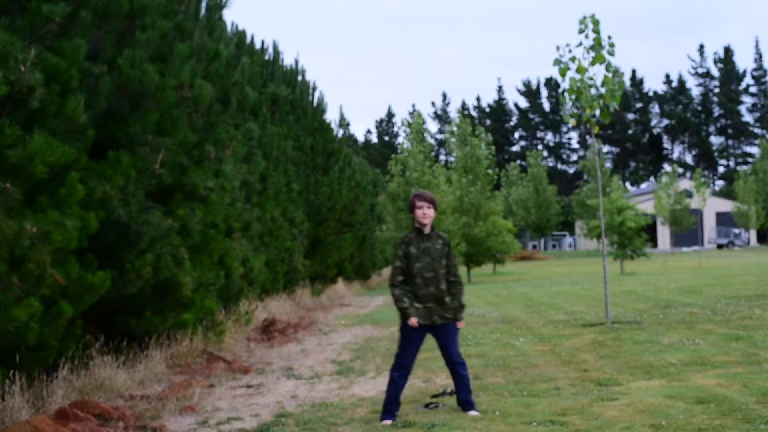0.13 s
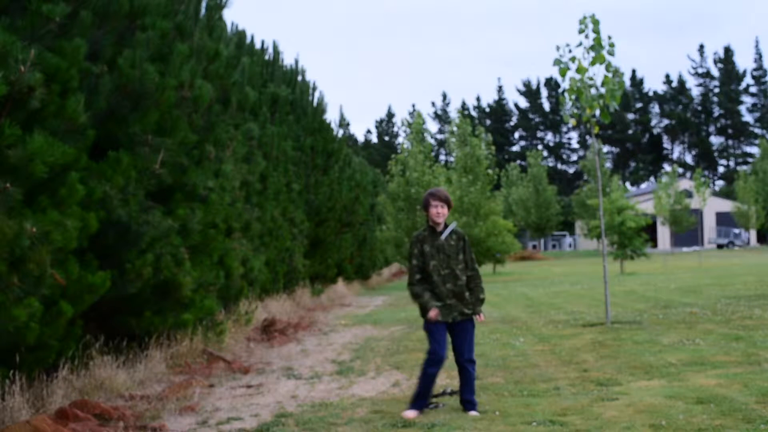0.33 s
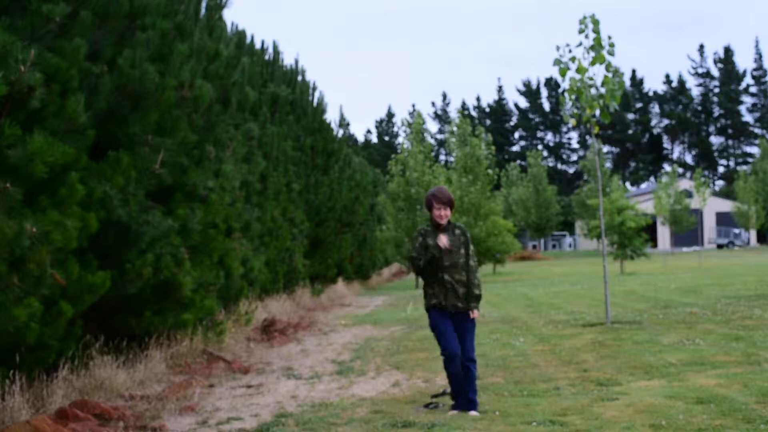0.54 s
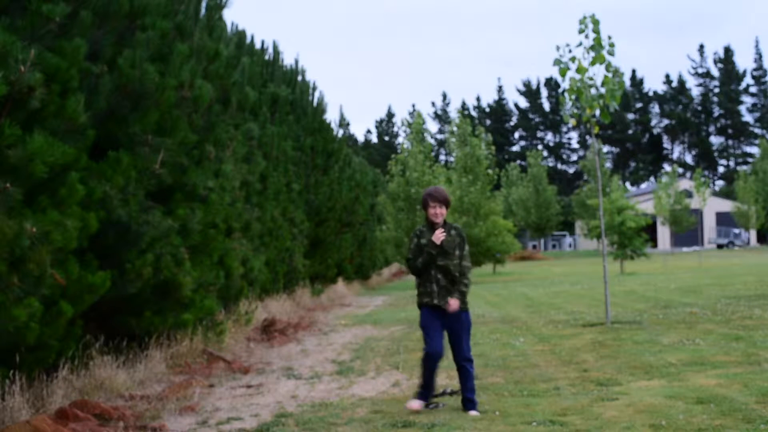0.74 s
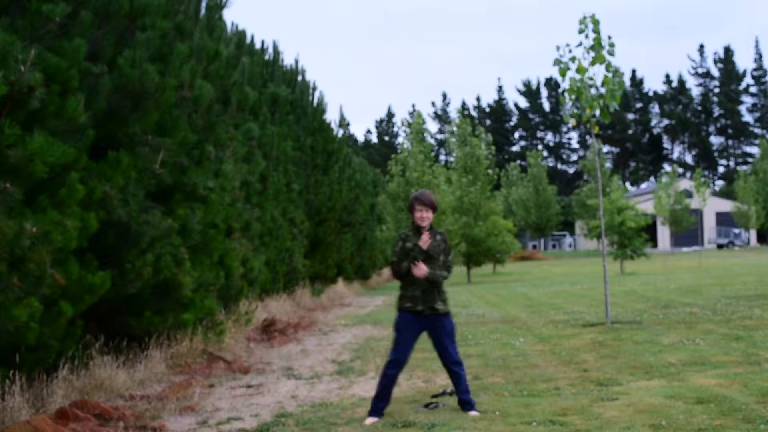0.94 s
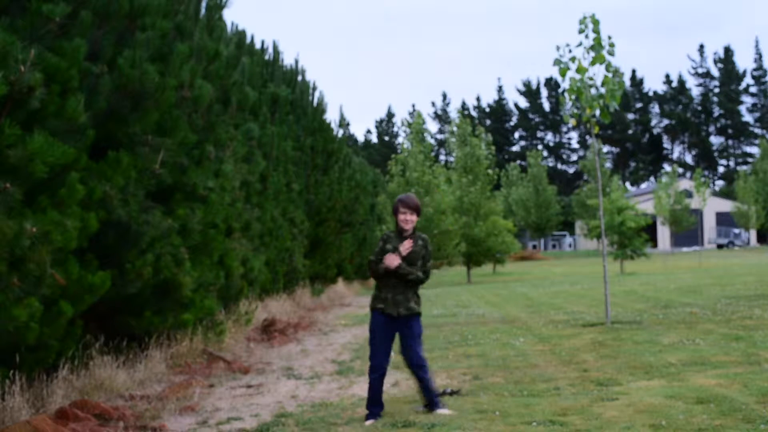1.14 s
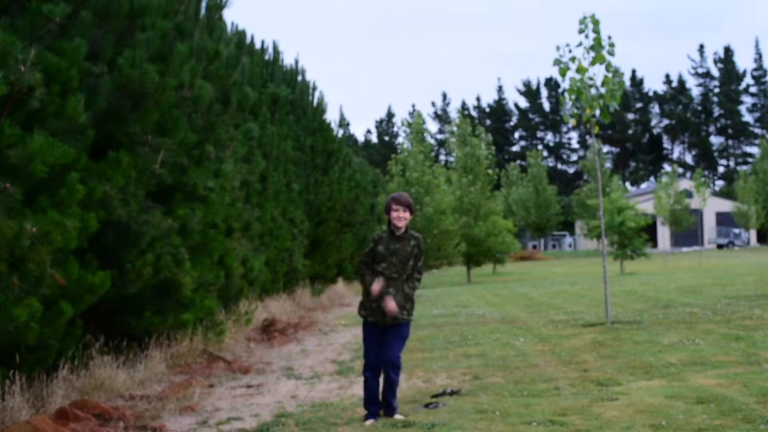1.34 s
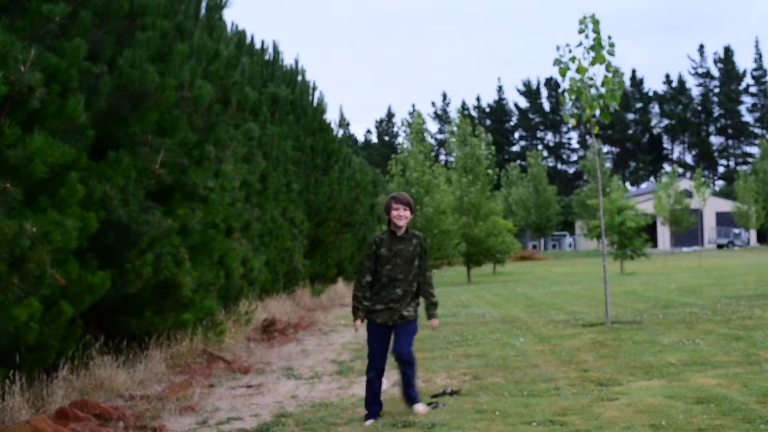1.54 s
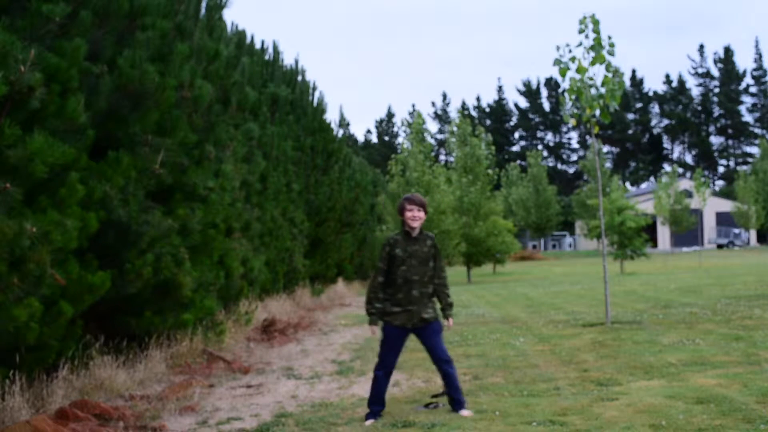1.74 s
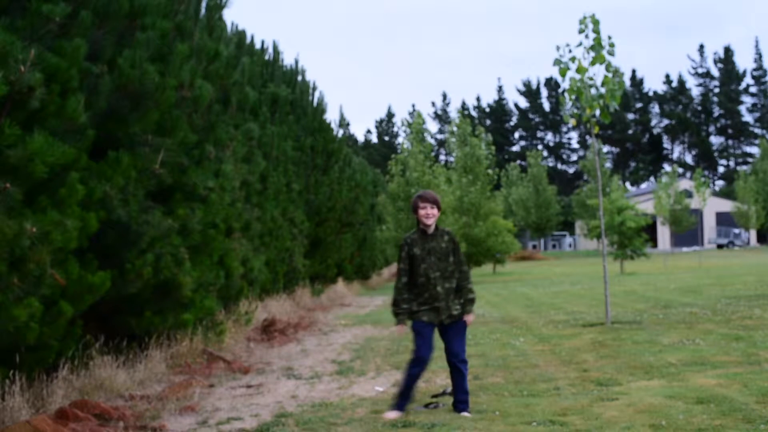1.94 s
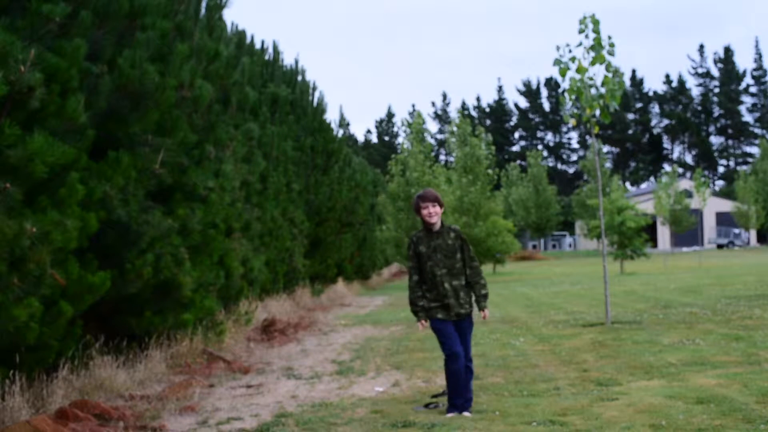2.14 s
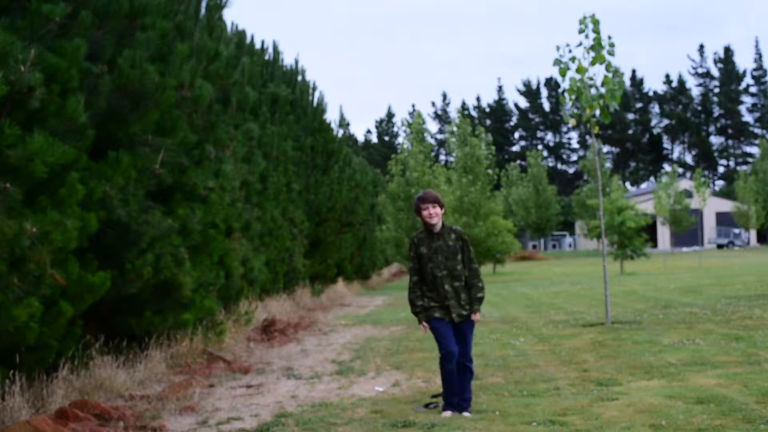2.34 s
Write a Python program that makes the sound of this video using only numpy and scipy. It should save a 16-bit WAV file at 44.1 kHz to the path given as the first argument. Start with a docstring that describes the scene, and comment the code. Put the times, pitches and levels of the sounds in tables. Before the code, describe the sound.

A spring toy blaster fires one hard, overloaded plastic crack close to the microphone, then soft handling knocks and sleeve rustle, and finally the slide is pulled back with clicking snaps; faint birds in an open field.

```python
"""A spring-powered foam dart blaster fires close to the microphone in an open field and overloads it.
Rough noise bursts and ringing plastic make its clacks; a pulse rings the barrel. Its shell knocks softly
in the hands and sleeves rustle; then the slide is pulled back, latches with a snap and starts forward again.
Trees scatter a short echo as dying noise. Small birds chirp far off in gliding tones,
over quiet air of filtered noise, a faint low hum and one faint far tone."""
import sys
import numpy as np
from scipy import signal
from scipy.fft import rfft, irfft
from scipy.io import wavfile
from scipy.ndimage import map_coordinates

SR = 44100
rng = np.random.default_rng(int(sys.argv[2]) if len(sys.argv) > 2 else 0)


def digitize_waveform(pressure):
    """Quantize a signal to 16-bit integers and store it at the path in sys.argv[1].

    Rows of a 2-D input are taken as channels; values are limited to [-1, 1].
    """
    field = np.atleast_2d(pressure).T
    bounded = np.clip(field, -1, 1)
    quanta = np.round(bounded * 32767).astype(np.int16)
    wavfile.write(sys.argv[1], SR, quanta)


N = 105840
TIME = np.arange(N) / SR   # seconds

# Ringing tones of the plastic shell. Each row: pitch in Hz, relative level in dB, time to fall 60 dB in seconds.
SHELL_MODES = [(1336, -9, 0.028), (1490, -11, 0.04), (1565, -15.5, 0.041), (2225, -6, 0.031),
               (2390, -8.5, 0.035), (2518, -6, 0.038), (2925, -9.5, .035), (4330, -13, 0.06),
               (4566, -12.5, 0.045), (4810, -9.5, 0.04), (7960, -16, 0.04)]
# Ringing tones of the slide and its latch. Each row: pitch in Hz, relative level in dB,
# time to fall 60 dB in seconds.
LATCH_MODES = [(1040, -9, 0.044), (1320, -10.5, .03), (1890, -13.5, 0.044), (2130, -11, .055),
               (2310, -8.5, 0.03), (2500, -10, .025), (2870, -9, 0.039), (3760, -9, 0.019),
               (4720, -9, 0.016)]
# Tone colour of the crack of plastic parts. Each row: frequency in Hz, relative level in dB per Hz.
CRACK_SPECTRUM = [(80, -33), (400, -5), (1000, -2.5), (2500, 2.5), (3500, -2.5), (5000, -1.5), (7500, -3),
                  (9000, -11), (12500, -15), (16000, -20.5)]
# Tone colour of the slide's hollow knock on the body. Each row: frequency in Hz, relative level in dB per Hz.
KNOCK_SPECTRUM = [(60, -36), (240, -20), (400, -6), (530, -3.5), (660, 3.5), (830, -3), (1100, -4.5),
                  (2000, -14), (4000, -25.5), (16000, -46)]
# Tone colour of the outdoor air. Each row: frequency in Hz, relative level in dB per Hz.
AIR_SPECTRUM = [(15, -43), (25, -17), (45, -11), (75, -12), (110, -6), (160, 1), (225, -8.5), (305, -3.5),
                (500, -11), (850, -8.5), (1600, -21.5), (2600, -20.5), (3400, -13), (6000, -24.5),
                (15500, -31)]


def from_db(db):
    """Turn decibels into a gain."""
    return 10 ** (np.asarray(db) / 20)


def rms_one(x):
    """Scale to an rms (average strength) of 1."""
    return x / np.sqrt(np.mean(x ** 2) + 1e-20)


def colour(x, spectrum):
    """Filter with the given spectrum, never sounding ahead of the input; white noise keeps its power."""
    size = 8192
    hz, db = np.transpose(spectrum)
    bin_hz = np.arange(size // 2 + 1) * SR / size
    gain = rms_one(from_db(np.interp(np.log(bin_hz + 1), np.log(hz), db)))
    # folding the cepstrum forward gives the filter its quickest response (minimum phase)
    cepstrum = irfft(np.log(gain))
    cepstrum[1:size // 2] *= 2
    cepstrum[size // 2 + 1:] = 0
    response = irfft(np.exp(rfft(cepstrum)))
    return signal.fftconvolve(x, response)[:N]


def drift(rate):
    """Smooth random motion of rms 1, drawn through `rate` random points per second."""
    points = rng.standard_normal(N // 20)
    return rms_one(map_coordinates(points, [TIME * rate], order=2, mode="wrap"))


def ring(drive, modes):
    """Sum of decaying tones with alternating signs; a unit click rings each at its level."""
    out = 0
    for k, (hz, db, t60) in enumerate(modes):
        r = from_db(-60 / (t60 * SR))   # what is left after one sample
        w = 2 * np.pi * hz / SR
        tone = signal.lfilter([0, np.sin(w)], [1, -2 * r * np.cos(w), r * r], drive + 1e-18)
        out = out + (-1) ** k * from_db(db) * tone
    return out


def grains(spread_db):
    """Dense tiny contacts of uneven strength, as noise of rms 1."""
    strength = from_db(spread_db * np.clip(drift(1800), -2, 2))
    return rms_one(rng.standard_normal(N) * strength)


def decay(start, seconds):
    """Envelope that jumps to 1 and falls to 1/e in the given seconds."""
    return (TIME >= start) * np.exp(-np.maximum(TIME - start, 0) / seconds)


def scatter(x, t60, delay):
    """Dense dying echoes from ground and foliage, at equal power."""
    echoes = rng.standard_normal(N) * decay(delay, t60 / np.log(1000))
    return signal.fftconvolve(x, echoes / np.sqrt(np.sum(echoes ** 2)))[:N]


def contacts(rows, crack_spectrum, knock_spectrum, modes, rise_s, shell_db, strike, grain_db):
    """Plastic parts meet and chatter briefly: a crack, a dull knock and ringing plastic."""
    treble_hz, shell_chatter = 4500, .12   # where treble takes over; how much chatter drives the ringing
    clicks, chatter, knock, treble = np.zeros((4, N))
    for s, db, seconds, knock_db, treble_db in rows:
        rise = np.clip((TIME - s) / rise_s, 0, 1)
        power = (from_db(db) * decay(s, seconds) * rise) ** 2
        clicks[min(int((s + rise_s) * SR), N - 1)] += from_db(db)
        chatter += power
        knock += power * from_db(knock_db) ** 2
        treble += power * from_db(treble_db) ** 2
    low = signal.butter(1, treble_hz, "low", fs=SR)
    high = signal.butter(1, treble_hz, "high", fs=SR)
    grit = grains(grain_db)
    crack = signal.lfilter(*low, grit * np.sqrt(chatter))
    crack += signal.lfilter(*high, grit * np.sqrt(treble))
    drive = strike * clicks + shell_chatter * grains(grain_db) * np.sqrt(chatter)
    ringing = from_db(shell_db) * ring(drive, modes)
    dull_knock = colour(grains(grain_db) * np.sqrt(knock), knock_spectrum)
    return colour(crack, crack_spectrum) + dull_knock + ringing


def shot():
    """The catch lets go, then the plunger lands and rebounds, rattling the shell."""
    # Each row: start in seconds, level in dB, chatter decay in seconds,
    # knock and treble in dB relative to that level.
    shot_hits = [(.2216, -14, 0.014, -11.5, 2), (.2272, -4.5, 0.0052, 2, -3), (.2326, -6, 0.0029, 1.5, 2),
                 (.2428, -11, 0.004, -15, 1.5), (.2450, -11.5, .003, -12, 2.5),
                 (.2530, -29.5, 0.013, -8.5, 4)]
    # Hard crack of the plunger. Each row: frequency in Hz, relative level in dB per Hz.
    slam_spectrum = [(100, -18), (400, -7), (1000, -2), (1500, 0), (1950, -2), (2500, 3.5), (3500, -5.5),
                     (4800, -0.5), (7500, -5.5), (8600, -11), (12500, -13), (16000, -23)]
    # Thump of the plunger. Each row: frequency in Hz, relative level in dB per Hz.
    thump_spectrum = [(30, -5), (80, -22), (180, -16.5), (260, -21), (460, -4.5), (700, -3.5), (1100, -2),
                      (1600, -5.5), (3000, -16.5), (16000, -50)]
    return contacts(shot_hits, slam_spectrum, thump_spectrum, SHELL_MODES,
                    rise_s=.0006, shell_db=-8.5, strike=0.82, grain_db=2.5)


def air_pop():
    """The plunger drives a pulse of air out of the barrel and sets it ringing."""
    # Air column and spring chamber. Each row: pitch in Hz, relative level in dB, time to fall 60 dB in seconds.
    barrel_modes = [(108, -33, 0.11), (194, -19.5, 0.066), (319, -21.5, 0.055), (442.7, -14.5, .055),
                    (590, -13.5, 0.035), (683, -7.5, .055), (920.5, -6, 0.039), (1080, -0.5, 0.04),
                    (1385, -8.5, .045), (1563, -8.5, 0.04), (1730, -9.5, .045)]
    start_s, rise_s = .2273, 0.00087
    puff_db, puff_decay_s = -22.5, 0.0043   # the low puff, under the same rise
    pulse = np.zeros(N)
    pulse[int(start_s * SR)] = 1
    swell = 1 - np.exp(-np.maximum(TIME - start_s, 0) / rise_s)
    puff = from_db(puff_db) * decay(start_s, puff_decay_s)
    return swell * (ring(pulse, barrel_modes) + puff)


def catches():
    """The catches of the slide snap and knock as it is pulled back and starts forward."""
    # Each row: start in seconds, level in dB, chatter decay in seconds,
    # knock and treble in dB relative to that level.
    catch_hits = [(2.0078, -37, .016, -17, -2), (2.0212, -33, 0.0037, -18, 10.5),
                  (2.0266, -21.5, 0.0038, -22, 3.5), (2.0306, -25.5, 0.0061, -3, 0),
                  (2.0403, -29, 0.005, 0, 10), (2.0558, -30.5, 0.0043, -2, 4),
                  (2.0655, -35.5, 0.0074, 1, -3), (2.0824, -29, 0.004, -10.5, 8),
                  (2.0995, -40, 0.007, -1.5, 2), (2.1094, -38, 0.007, -6, 6), (2.1195, -28, .008, -10, 0),
                  (2.1250, -25, 0.0066, -13, 9), (2.1293, -15.5, 0.0032, -3.5, 5),
                  (2.1349, -26, 0.007, 1, -6), (2.3266, -28.5, 0.0047, -18, 0), (2.3770, -37, .005, 0, -15),
                  (2.3825, -36.5, 0.0058, 6.5, 5.5), (2.3928, -35.5, 0.0052, 10, 8.5)]
    return contacts(catch_hits, CRACK_SPECTRUM, KNOCK_SPECTRUM, LATCH_MODES,
                    rise_s=.0006, shell_db=-3, strike=0.28, grain_db=2.0)


def slide():
    """The slide scrapes along its rails and keeps its ringing tones going."""
    # Strength of the rubbing, joined by straight lines. Each row: time in seconds, level in dB before the mix.
    rub_levels = [(1.94, -71), (2.002, -61.5), (2.016, -38), (2.062, -38), (2.079, -46), (2.12, -48),
                  (2.155, -40), (2.205, -59.5), (2.31, -65), (2.36, -51.5), (2.40, -51)]
    rub = from_db(np.interp(TIME, *np.transpose(rub_levels))) * grains(spread_db=2.5)
    scrape = 1.1 * colour(rub, CRACK_SPECTRUM)
    hollow = from_db(-9.5) * colour(rub, KNOCK_SPECTRUM)
    return scrape + hollow + 0.039 * ring(rub, LATCH_MODES)


def pawl():
    """The stiff catch pings brightly each time it drops into a notch."""
    # Each row: time of the drop in seconds, level in dB.
    drops = [(2.0412, -28), (2.0832, -31), (2.1298, -12.5)]
    # Ringing tones of the catch. Each row: pitch in Hz, relative level in dB, time to fall 60 dB in seconds.
    pawl_modes = [(5660, -1, .024), (6260, -3, .024)]
    clicks = np.zeros(N)
    for s, db in drops:
        clicks[int(s * SR)] = from_db(db)
    return ring(clicks, pawl_modes)


def handling():
    """The shell knocks softly in the hands, with a hollow thud and a short ring."""
    # Each row: start in seconds, level in dB, chatter decay in seconds,
    # knock and treble in dB relative to that level.
    hand_knocks = [(.470, -58.5, 0.021, 5, -4), (.904, -44, .001, 2, 4.5), (.919, -45, 0.0013, -9, 10.5),
                   (.951, -50, 0.006, 3, -9.5), (0.979, -53.5, 0.008, 10.5, -8),
                   (.990, -56.5, 0.0072, 12, -6), (1.032, -51, 0.0096, 13.5, 4),
                   (1.073, -54.5, 0.006, 16, 9), (1.311, -41.5, 0.0094, -1.5, -9),
                   (1.333, -46, 0.012, -1.5, -2.5), (1.86, -49.5, .004, -2, -2),
                   (1.902, -46.5, 0.0067, -13, -13), (1.927, -43, 0.0093, -6, -23)]
    # Hollow thud of the hands. Each row: frequency in Hz, relative level in dB per Hz.
    thud_spectrum = [(60, -32), (170, -7), (350, -1.5), (620, 2), (1000, -6), (1400, -4.5), (2500, -20),
                     (16000, -55)]
    return contacts(hand_knocks, CRACK_SPECTRUM, thud_spectrum, SHELL_MODES,
                    rise_s=0.00136, shell_db=-6.5, strike=0.33, grain_db=2.5)


def sleeves():
    """Sleeves rub as the hands move: uneven rustle and smooth swish in soft swells of noise."""
    # Each row: middle in seconds, spread (standard deviation) in seconds, rustle in dB, swish in dB.
    moves = [(0.517, 0.11, -64.5, -70.5), (0.998, 0.066, -56.5, -68), (1.28, 0.082, -72, -64.5),
             (1.79, .06, -63.5, -65.5), (1.916, 0.04, -60, -70)]
    # Rustling cloth. Each row: frequency in Hz, relative level in dB per Hz.
    cloth_spectrum = [(100, -12.5), (400, 5.5), (900, 3), (2000, -0.5), (5000, -7.5), (16000, -18.5)]
    # Cloth sliding on cloth. Each row: frequency in Hz, relative level in dB per Hz.
    swish_spectrum = [(1500, -14.5), (5500, 1), (8300, -1.5), (11000, -13)]
    rustle, swish = np.zeros((2, N))
    for s, spread_s, rustle_db, swish_db in moves:
        swell = np.exp(-.5 * ((TIME - s) / spread_s) ** 2)
        rustle += from_db(rustle_db) * swell
        swish += from_db(swish_db) * swell
    scuffs = from_db(2.5 * drift(110))   # unevenness, 2.5 dB rms
    rustling = colour(rustle * scuffs * grains(spread_db=2.5), cloth_spectrum)
    return rustling + colour(swish * rng.standard_normal(N), swish_spectrum)


def field_echoes(blaster):
    """The hedge and the trees send the blaster's sound back as dense, dying echoes."""
    # Tone colour of the echoes. Each row: frequency in Hz, relative level in dB per Hz.
    echo_spectrum = [(40, 4), (110, 9.5), (190, -1), (290, 3), (700, -2.5), (1150, -4), (2400, -4.5),
                     (4000, 1), (8000, -1), (15000, -10)]
    # Each row: delay in seconds, time to fall 60 dB in seconds, level in dB before halving.
    reflections = [(0.013, .13, -21), (.053, .085, -27.5), (.08, .9, -42)]
    sent = colour(blaster, echo_spectrum)
    return sum(.5 * from_db(db) * scatter(sent, t60, delay) for delay, t60, db in reflections)


def birds():
    """Birds sing short warbling glides, heard straight, through nearby leaves and blurred by the trees."""
    # Each row: start in seconds, length in seconds, first and last pitch in Hz before the warble,
    # level in dB before the three paths.
    chirps = [(0.0, 0.013, 3480, 3310, -48.5), (0.023, 0.029, 3250, 3310, -47.5),
              (0.045, 0.02, 3300, 3010, -50), (0.056, 0.011, 2720, 2700, -56),
              (0.181, 0.018, 3700, 3240, -63.5), (0.586, .03, 3397, 3020, -62.5),
              (0.638, 0.016, 4360, 4690, -56.5), (.648, .042, 3405, 3150, -61.5),
              (0.707, 0.0093, 4136, 4004, -61), (0.856, .03, 3487, 3195, -64),
              (1.092, 0.027, 4530, 3936, -60), (1.427, 0.028, 3500, 5090, -54),
              (1.452, 0.032, 3950, 3077, -50), (1.494, 0.029, 3170, 3390, -50.5),
              (1.52, 0.014, 3054, 2980, -49), (1.640, 0.026, 4100, 3600, -64),
              (1.676, 0.03, 3130, 3260, -53.5)]
    song = np.zeros(N)
    warble = 1 + 0.045 * drift(420)   # pitch wavers by 4.5 % rms
    for s, length, first_hz, last_hz, db in chirps:
        along = np.clip((TIME - s) / length, 0, 1)
        hz = (first_hz + (last_hz - first_hz) * along) * warble
        swell = np.sqrt(np.abs(np.sin(np.pi * along)))
        song += from_db(db) * swell * np.sin(2 * np.pi * np.cumsum(hz) / SR)
    direct = from_db(-2) * song
    leaves = from_db(-2) * scatter(song, t60=.06, delay=0)
    trees = from_db(-1.5) * scatter(song, t60=.28, delay=0.00067)
    return direct + leaves + trees


def field():
    """Outdoor air is noise of wavering level; the hum and the faint far tone are sines."""
    # Distant hum. Each row: pitch in Hz, rms level in dB before the waver.
    hum_tones = [(53.8, -74), (107.7, -69.5), (161.5, -68), (306.8, -72.5)]
    air_db = -59 - 0.65 * drift(17)
    air = from_db(air_db) * colour(rng.standard_normal(N), AIR_SPECTRUM)
    hum = 0
    for hz, db in hum_tones:
        wave = np.sin(2 * np.pi * hz * TIME + drift(14))   # phase wavers by 1 radian rms
        hum = hum + from_db(db) * np.sqrt(2) * wave * (1 + 0.62 * drift(24))
    middle_s, spread_s, tone_hz, tone_db = 1.782, 0.044, 406, -61.5
    swell = np.exp(-.5 * ((TIME - middle_s) / spread_s) ** 2)
    tone = from_db(tone_db) * swell * np.sin(2 * np.pi * tone_hz * TIME)
    return air + hum + tone


def scene():
    """All sources sit in the centre; air-coloured noise and faint, even white noise differ between the sides."""
    side_air_db, side_noise_db = -80, -65
    firing = shot() + air_pop()
    priming = catches() + slide() + pawl()
    hands = handling() + sleeves()
    blaster = firing + priming + hands
    centre = blaster + field_echoes(blaster) + birds() + field()
    side = from_db(side_air_db) * colour(rng.standard_normal(N), AIR_SPECTRUM)
    side_noise = from_db(side_noise_db) * rng.standard_normal((2, N))
    return centre + np.array([side, -side]) + side_noise


def record(dry):
    """Overload flattens the peaks; a steep filter then cuts the highest treble."""
    overload, cutoff_hz = 0.96, 15750
    clipped = np.clip(dry, -overload, overload)
    low_pass = signal.ellip(14, .1, 100, cutoff_hz, fs=SR, output="sos")
    return signal.sosfilt(low_pass, clipped)


dry = scene()
out = record(dry)
digitize_waveform(out)
```